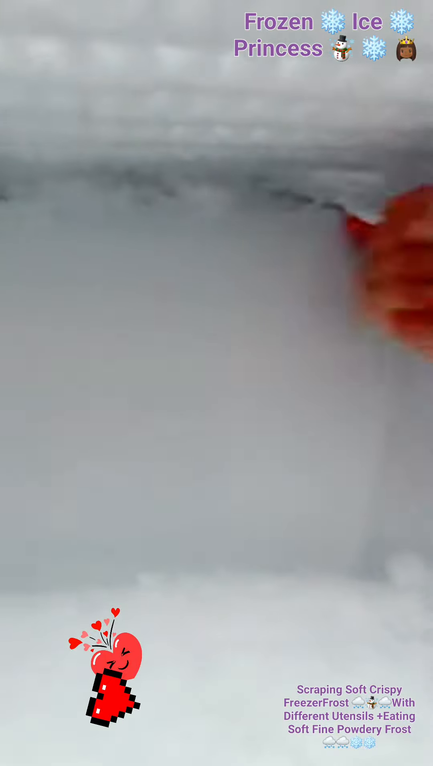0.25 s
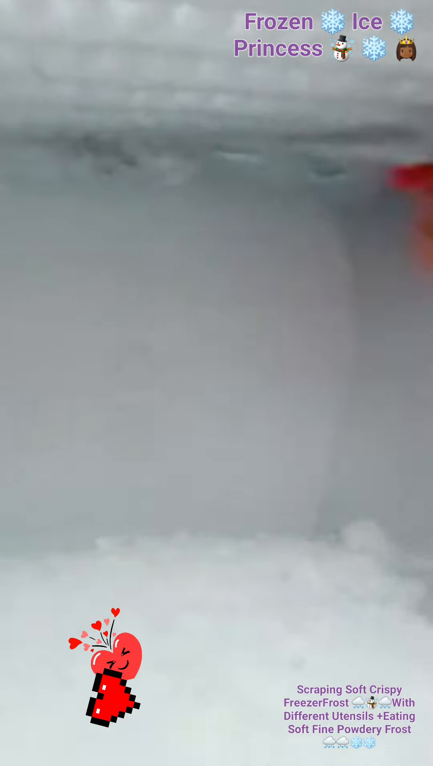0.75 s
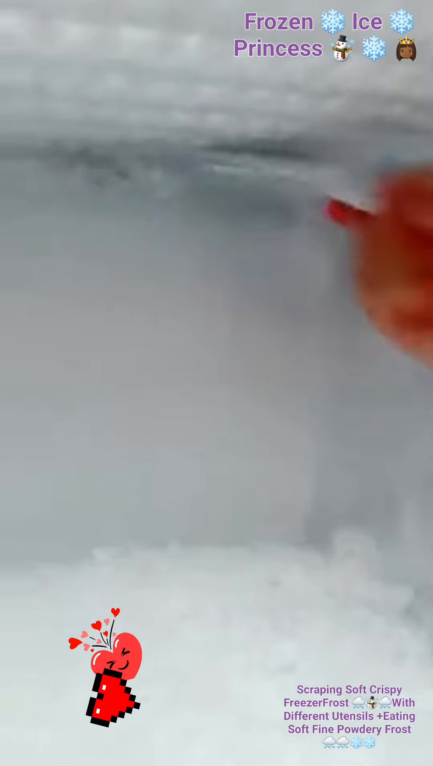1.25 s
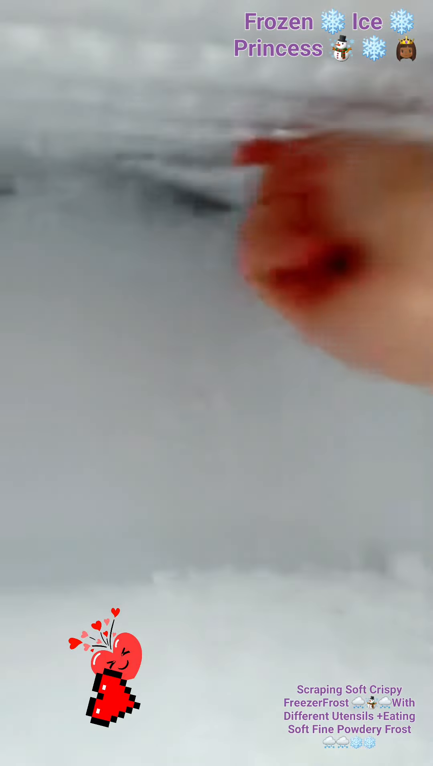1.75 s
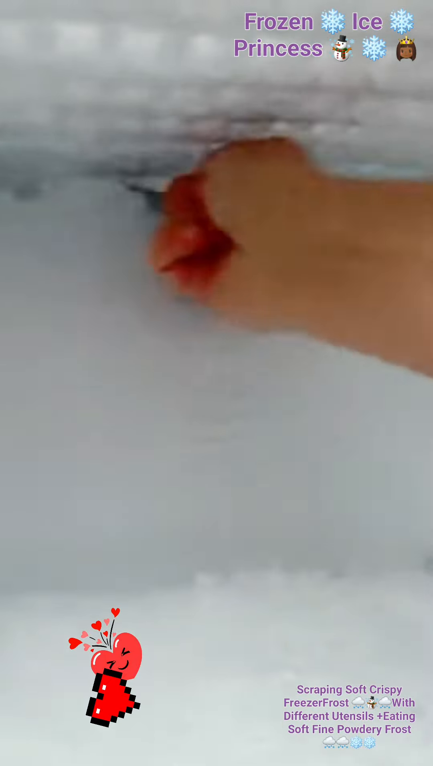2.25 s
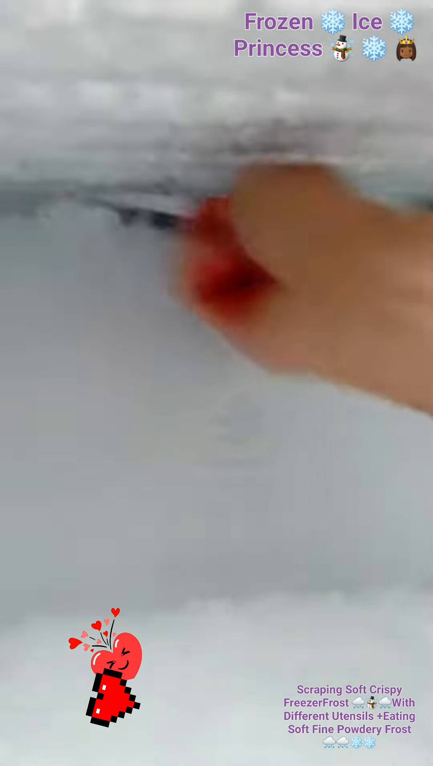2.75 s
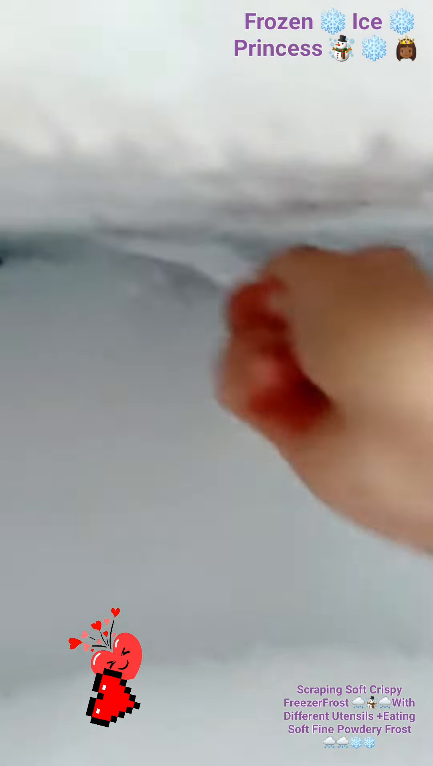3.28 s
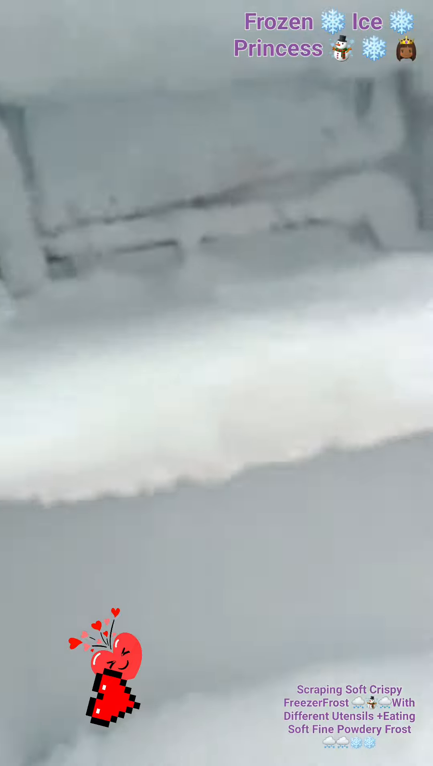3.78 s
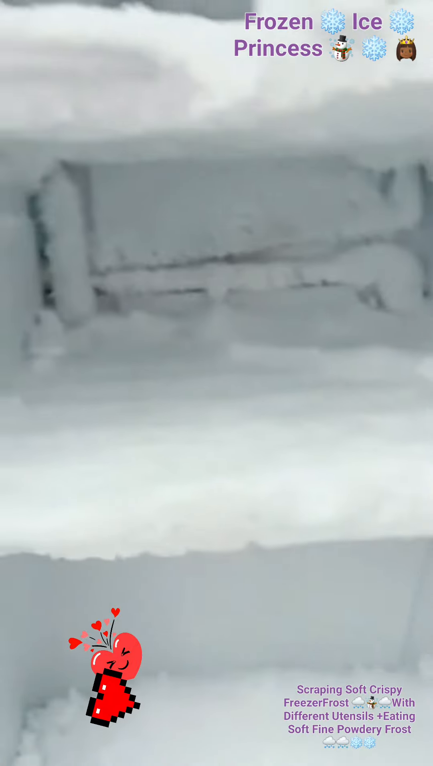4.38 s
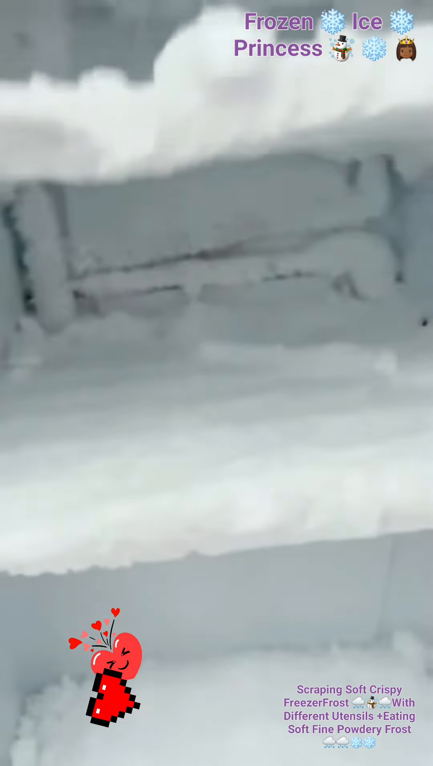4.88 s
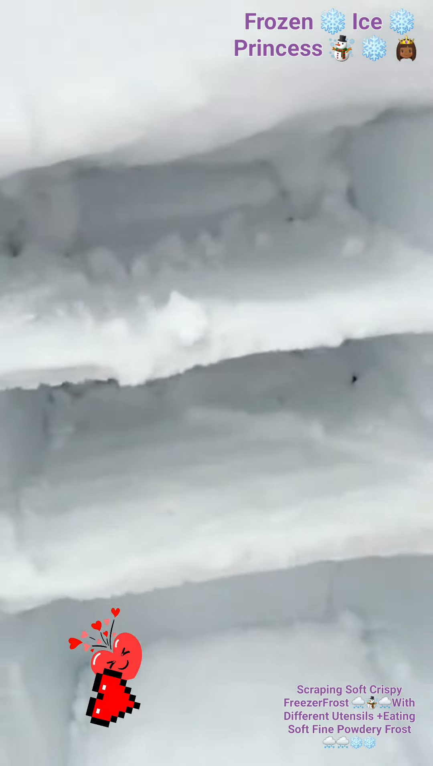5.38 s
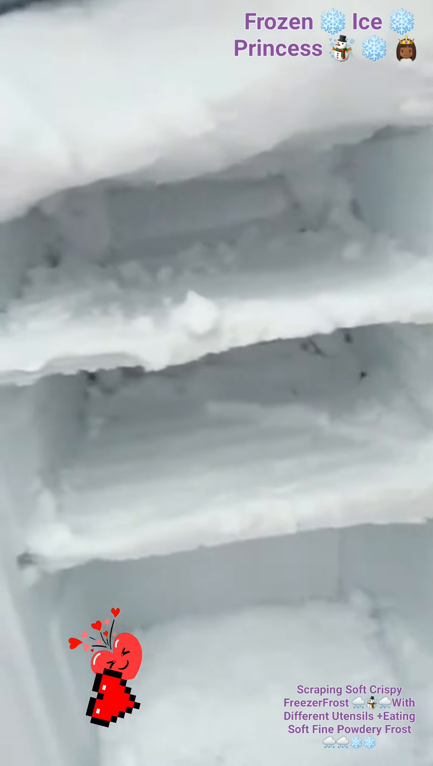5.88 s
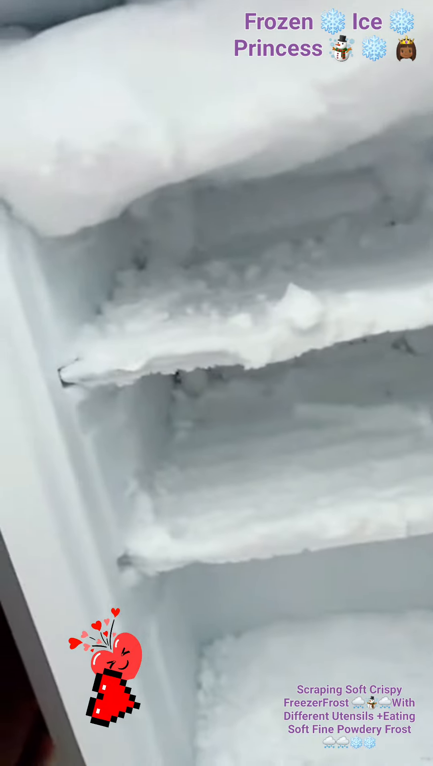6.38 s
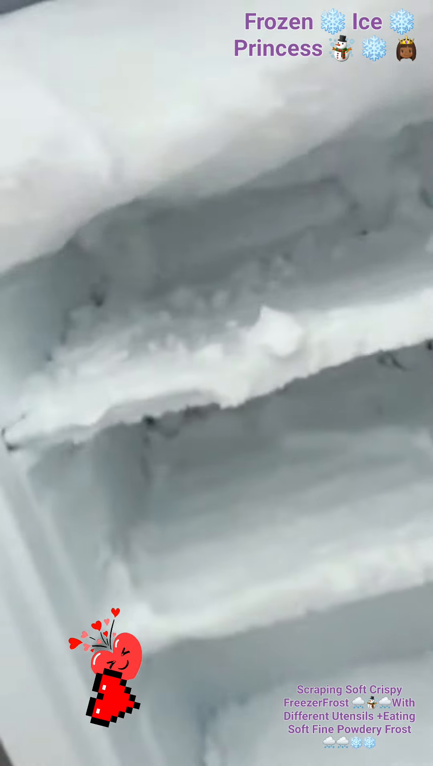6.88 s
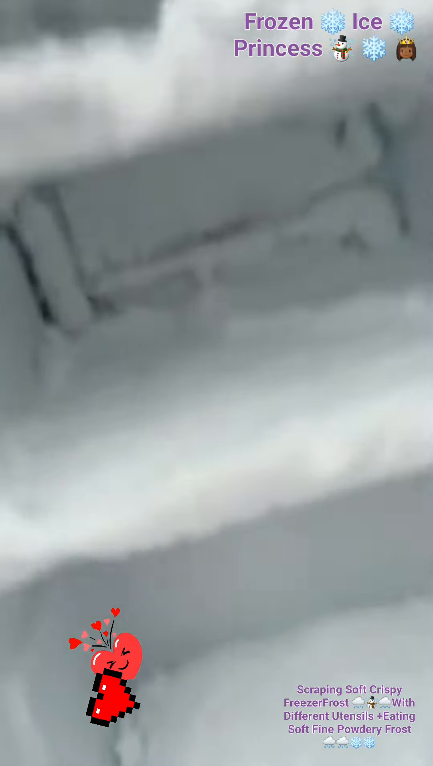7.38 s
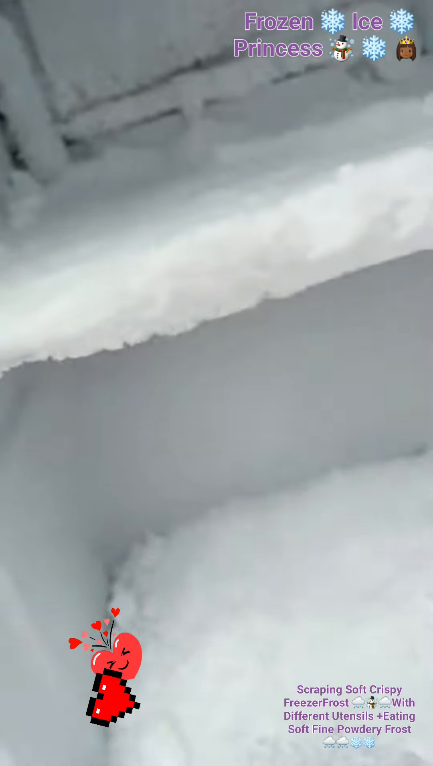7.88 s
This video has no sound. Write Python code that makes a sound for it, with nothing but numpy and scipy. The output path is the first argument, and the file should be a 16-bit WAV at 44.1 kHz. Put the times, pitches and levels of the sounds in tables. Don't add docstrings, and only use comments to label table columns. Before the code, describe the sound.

From 0 to 0.3 s there are only light ticks and a faint scrape. From 0.3 to 3.7 s a utensil scrapes freezer frost in irregular strokes: bright, gritty, crackling pushes, strongest around 0.3, 1.0, 2.0, 2.5 and 3.3 s, with softer returns between. Lumps crunch, the blade sings slightly, and shelf and cabinet answer with hollow low thuds. About 3.8 s a little powder trickles, then quiet scuffs. At 4.3 s a sole taps; at 4.5-4.6 s it squeaks sharply, followed by a heavy knock and short plastic drag. A hissing slide comes at 5.2 s, a tiny creak at 5.7 s and a faint chirp near 5.9 s. Between 6.1 and 6.65 s plastic is shoved and knocked hard several times, clattering away by 7 s. Faint ticks and drags follow, with a short slide at 8.1 s. Low compressor hum and room air continue throughout, dipping after the knocks and recovering.

```python
import sys
import numpy as np
from scipy import signal
from scipy.fft import rfft, irfft, next_fast_len
from scipy.io import wavfile
from scipy.ndimage import uniform_filter1d

SR = 44100
rng = np.random.default_rng(int(sys.argv[2]) if len(sys.argv) > 2 else 0)


def dump(signal):
    limited = np.clip(np.atleast_2d(signal).T, -1, 1)
    pcm = np.round(limited * 32767).astype(np.int16)
    wavfile.write(sys.argv[1], SR, pcm)


def boost_factor(decibels):
    exponent = np.asarray(decibels, float) / 20
    return 10 ** exponent


N = 358958
TIME = np.arange(N) / SR


def kernel(points):
    hz, db = np.transpose(points)
    f = np.maximum(np.fft.rfftfreq(4096, 1 / SR), 1)
    cepstrum = irfft(np.interp(np.log(f), np.log(hz), db) * np.log(10) / 20)
    cepstrum[1:2048] *= 2
    cepstrum[2049:] = 0
    h = irfft(np.exp(rfft(cepstrum)))[:2048]
    return h / np.sqrt(np.sum(h ** 2))


def band(lo_hz, hi_hz, tilt_db):
    return kernel([(lo_hz * 0.56, -40), (lo_hz, 0), (hi_hz, tilt_db), (hi_hz * 1.74, tilt_db - 57.5)])


def modes(table):
    t = TIME[:SR // 5]
    h = np.zeros(len(t))
    for hz, db, t60 in table:
        h += boost_factor(db) / np.sqrt(t60) * np.sin(2 * np.pi * hz * t) * 1000. ** (-t / t60)
    h = signal.sosfilt(signal.butter(6, .85 * table[0][0], "high", fs=SR, output="sos"), h)
    return h / np.sqrt(np.sum(h ** 2))


def through(x, h):
    return signal.oaconvolve(x, h)[:N]


def walk(rate):
    k = int(SR / rate)
    steps = np.repeat(rng.standard_normal(N // k + 1), k)
    return 1.24 * uniform_filter1d(uniform_filter1d(steps, k), k)[:N]


def grains(share, spread_db):
    chance, sign, size = rng.random((3, N))
    x = (chance < share) * np.sign(sign - .5) * boost_factor(-spread_db * np.log(1.002 - size))
    return x / np.sqrt(np.mean(x ** 2))


def effort(rows, start_db, end_db, share, rise, fall):
    t = TIME[::64]
    s, length, a, b, extra = np.transpose(rows)[:, :, None]
    done = np.clip((t - s) / length, 0, 1) ** 0.66
    db = a + start_db + (b + end_db - a - start_db) * done + share * extra
    db = db - rise * np.maximum(s - t, 0) - fall * np.maximum(t - s - length, 0)
    return np.interp(TIME, t, np.sqrt(boost_factor(2 * np.maximum(db, -120)).sum(axis=0)))


def tone(hz, t):
    build_cycles = 0.45
    return (1 - np.exp(-t * hz / build_cycles)) * np.sin(2 * np.pi * hz * t)


def decays(times, dbs, t60s, tones_hz=None):
    out = np.zeros(N)
    for k, (s, db, t60) in enumerate(zip(times, dbs, t60s)):
        i = int(np.ceil(max(s, 0) * SR))
        t = TIME[i:i + SR // 3] - s
        carrier = 1 if tones_hz is None else tone(tones_hz[k], t)
        out[i:i + len(t)] += boost_factor(db) * 1000. ** (-t / max(t60, .004)) * carrier
    return out


def field(bins, hops):
    z = uniform_filter1d(rng.standard_normal((129, N // 64 + 8)), bins, axis=0)
    z = uniform_filter1d(uniform_filter1d(z, hops, axis=1), hops, axis=1)
    return z / z.std()


def patchy(x, patches, tilt_db):
    f, t, z = signal.stft(x, SR, nperseg=256, noverlap=192)
    treble = np.clip((f[:, None] - 7000) / 2500, 0, 1) * np.interp(t, TIME, tilt_db)
    return signal.istft(z * boost_factor(treble + patches[:, :len(t)]), SR, nperseg=256, noverlap=192)[1][:N]


def ridge(table, width_hz):
    t = 64 * np.arange(N // 64 + 8) / SR
    s, hz, db = np.transpose(table)
    away = (np.fft.rfftfreq(256, 1 / SR)[:, None] - np.interp(t, s, hz)) / width_hz
    return np.interp(t, s, db, 0, 0) * np.exp(-away ** 2)


# (f/Hz, level/dB per Hz)
ROOM_COLOUR = [(22, -13.5), (44, -11), (75, -9.5), (107, 4), (167, -5.5), (191, -17), (262, -9.5),
               (330, -19.5), (470, -13.5), (571, -21.5), (638, -12.5), (892, -29), (1170, -20),
               (6500, -24.5), (9500, -31), (15500, -32.5)]


def floor():
    return boost_factor(-50.5 + 2.85 * walk(3.763)) * through(rng.standard_normal(N), kernel(ROOM_COLOUR))


# (f/Hz, level/dB)
HUM_LINES = [(48.4, -51), (96.9, -61.5), (118.4, -60), (145.3, -62.5), (199.2, -62.5), (296.1, -64.5),
             (635.2, -65.5)]


def hum():
    out = np.zeros(N)
    for k, (hz, db) in enumerate(HUM_LINES):
        out += np.sqrt(2) * boost_factor(db - 2.5 + 3.0 * walk(18)) * np.sin(2 * np.pi * hz * TIME + k)
    return out


# (t/s, length/s, start level/dB, end level/dB, brightness/dB)
SCUFFS = [(3.76, 0.11, -81, -88, 25.5), (3.97, 0.097, -48.5, -43.5, 0.5), (4.12, 0.11, -51, -45, 0.5),
          (4.465, .025, -43, -46, -5), (4.271, 0.057, -41, -38.5, 3.5), (4.5, 0.083, -27.5, -26, -3),
          (4.79, 0.024, -32, -40, 0.5), (4.85, 0.3, -46.5, -49, -1.5), (5.58, 0.085, -49.5, -49, 7.5),
          (5.658, 0.053, -43, -44, 6), (5.74, 0.13, -50, -45, 5.5), (5.89, 0.22, -46, -50, -1),
          (7.63, 0.13, -51, -52.5, -2)]
SLIDES = [
    (5.19, 0.13, -42.5, -35.5, 0),
    (8.1, .05, -51.5, -40.5, 1),
]
DRAGS = [
    (4.63, 0.11, -36, -42, -0.5),
    (6.13, 0.085, -25.5, -34, -2),
    (6.23, 0.061, -46, -34.5, -4),
    (6.315, 0.059, -24.5, -26.5, -1.5),
    (6.385, 0.14, -30.5, -28, -0.5),
    (6.519, 0.05, -32, -34, 1),
    (6.587, 0.038, -29.5, -24, 4.5),
    (7.39, 0.19, -57.5, -60, 12),
    (7.8, 0.39, -50.5, -50.5, 13.5),
]
FADES = [
    (6.67, 0.33, -35, -61, 3),
]
CRUMBS = [
    (3.78, 0.17, -48, -54.5, 3),
    (3.855, .012, -52, -49, 4),
]
# (rows, rise/dB per s, fall/dB per s, share of skipping,
# then level/dB of rub, hiss, fine grit, rumble, dust)
SURFACES = [
    (SCUFFS, 1600, 196, 0.86, 0, -3, -7.5, -17, -38),
    (SLIDES, 290, 168, 0.177, 0, 9.8, -2, -4.5, -2),
    (DRAGS, 1700, 430, 1.4, 0, -7.5, -13.5, -0.69, -32),
    (FADES, 900, 100, .1, 0, -4, -15, -0.7, -32),
    (CRUMBS, 1500, 300, .8, -35, -32, -2.5, -3.5, 0.3),
]
# (f/Hz, level/dB per Hz)
GRIT_COLOUR = [(3290, -12), (5600, 5.5), (7580, 2.5), (9060, -7.5), (11900, -16), (14300, -8), (15500, -15)]
# (f/Hz, level/dB per Hz)
HISS_COLOUR = [(1700, -30.5), (2500, -1.5), (3250, -0.7), (3850, -1.5), (4450, -2), (5200, -6),
               (6000, -15.5), (8500, -51.5)]
# (f/Hz, level/dB, t60/s)
TUB_MODES = [(371, 11.5, 0.042), (625, 5, 0.69), (778, -26.5, 0.1), (980, -35, 0.1), (1300, -24, 0.18),
             (1530, 11, 0.14), (1690, 14.5, 0.0075), (1930, 14, 0.13), (2230, -15, 0.13), (2600, 10, 0.053),
             (2800, -7, 0.15), (3160, 3.5, 0.024)]


def shuffle(chatter, patches, hollows):
    grain = grains(.4, 1.94)
    faint = (TIME > SCUFFS[0][0]) * grain
    skips = [grain * boost_factor(row[3] * chatter) for row in SURFACES]

    def layer(k, share):
        return sum(skip * effort(rows, dbs[k], dbs[k], share, rise, fall)
                   for skip, (rows, rise, fall, _, *dbs) in zip(skips, SURFACES))

    rub = layer(0, 0) + boost_factor(-65.5) * faint
    rumble = layer(3, 0) + boost_factor(-62.5) * faint
    high = through(rub, band(1077, 2630, -0.21))
    high += through(layer(2, 1.0), kernel(GRIT_COLOUR))
    high += through(layer(4, 0.704), band(10000, 19000, -1.5))
    hiss = through(layer(1, 0.79), kernel(HISS_COLOUR))
    flat = 0 * TIME
    high = patchy(high, 0.89 * patches, flat) + patchy(hiss, 0.27 * patches + hollows, flat)
    ring = through(rub, modes(TUB_MODES[3:])) + through(rumble, modes(TUB_MODES[:3]))
    return boost_factor(-0.5) * high + through(rumble, band(302, 945, -0.4)) + boost_factor(-9.0) * ring


# (multiple, level/dB)
SQUEAK_ORDERS = [(0.999, -2), (2, -14), (2.9, -20), (4, -25.5)]


def squeak(table, rough):
    s, *columns = np.transpose(table)
    hz, db = [np.interp(TIME, s, c) for c in columns]
    on = (TIME >= s[0]) & (TIME <= s[-1])
    gate = uniform_filter1d(1. * on, 200)
    waver = 1 + rough * walk(300)
    live = gate > 0
    out = np.zeros(N)
    for order, order_db in SQUEAK_ORDERS:
        cycles = np.cumsum(order * hz[live] * waver[live]) / SR
        level = boost_factor(order_db + db[live] + 0.85 * order * walk(90)[live])
        out[live] += level * np.sin(2 * np.pi * cycles)
    return np.sqrt(2) * gate * out


# (t/s, slip rate f/Hz, level/dB)
LOW_SQUEAK = [(4.495, 1128, -32), (4.503, 1130, -17), (4.515, 1198, -15.5), (4.533, 1219, -12),
              (4.546, 1135, -19), (4.56, 1102, -13), (4.58, 1106, -14), (4.598, 1102, -13),
              (4.609, 1005, -22)]
# (t/s, slip rate f/Hz, level/dB)
HIGH_SQUEAK = [(4.49, 1634, -35), (4.503, 1600, -31), (4.52, 1510, -23), (4.535, 1480, -15),
               (4.55, 1463, -20), (4.565, 1464, -31), (4.59, 1450, -31), (4.606, 1475, -44)]
# (t/s, slip rate f/Hz, level/dB)
CHIRP = [
    (5.79, 1037, -53),
    (5.83, 1150, -44),
    (5.88, 1410, -38.5),
    (5.93, 1550, -57),
    (6.02, 1580, -43),
]


def squeaks():
    return squeak(LOW_SQUEAK, 0.012) + squeak(HIGH_SQUEAK, 0.0218) + squeak(CHIRP, 0.09)


# (f/Hz, level/dB, t60/s)
EDGE_MODES = [(1650, 4, 0.029), (2190, 2, 0.017), (2560, 1, 0.03), (2800, -3, .02), (2980, -19, .02),
              (4200, -9, .012), (4656, -8, .015), (6700, -15, .012)]


def creak():
    start_s, gap_s, slips = 5.6617, .0056, 7
    k = np.arange(slips)
    late, louder = rng.standard_normal((slips, 2)).T
    x = np.zeros(N)
    at = ((start_s + gap_s * (k + .08 * late)) * SR).astype(int)
    x[at] = boost_factor(-20.5 + 15.5 - 0.5 * k + 2.5 * louder)
    return through(x, modes(EDGE_MODES))


# (t/s, peak level/dB, treble above it/dB, bass above it/dB, ring f/Hz)
KNOCKS = [(0.0024, -21, 6, -17, 1770), (0.0722, -14.5, -1, -21, 2180), (4.274, -12, -4, -5, 1970),
          (4.3239, -16, 1, -35, 2080), (4.335, -23, 0, -30, 1870), (4.6128, -9.5, -3, 2.5, 1110),
          (4.6315, -15, -7, 3.5, 676), (4.792, -30, 4, -31, 1220), (4.8117, -13, -2, -26, 2030),
          (4.8727, -36.5, -20, 15, 1110), (5.5852, -30, 1, -14, 2210), (6.1256, -2, -6, -3.5, 2010),
          (6.1494, -10, -10, 1, 784), (6.3098, -12, -6, 3.5, 1950), (6.316, -2.5, -1, -3.5, 1790),
          (6.449, -19, -5, 7, 830), (6.482, -10, -14, 2.5, 1550), (6.5207, -4.5, -1.5, -16, 850),
          (6.587, -4, -1.5, -10, 1950), (6.6387, -8, -6, -23, 778), (7.3218, -39.5, 1.5, -13, 1130),
          (7.399, -44, -8, -8, 1180), (7.7967, -31, -4, -5, 806), (7.851, -27.5, -1, -12, 1530),
          (7.9, -25, -14, -10, 1600), (8.091, -26, 1, -25, 3140)]
# (t/s, f/Hz, level/dB, t60/s)
THUDS = [(.322, 437, -21, 0.11), (.52, 600, -23, .05), (0.611, 300, -24, .06), (1.0, 383.5, -9, 0.12),
         (1.0003, 1307, -5.5, 0.025), (1.0014, 1920, -15, 0.038), (1.0012, 2420, -22, .04),
         (1.005, 647, -12.5, 0.078), (1.215, 152.3, -9, 0.2), (1.541, 1244, -19.5, 0.069),
         (1.985, 497, -20, 0.13), (2.055, 483, -17.5, .08), (2.205, 148, -13.5, 0.23),
         (2.21, 292, -18.5, .1), (2.577, 148, -8, 0.18), (2.579, 293, -15.5, 0.095),
         (2.767, 965, -26, 0.12), (3.43, 100, -20, .15), (3.7, 149, -28, .15), (4.476, 228, -28.5, 0.081),
         (4.61, 110, -22, .1), (4.64, 114, -12, 0.15), (4.66, 727, -26, 0.17), (4.662, 1450, -39, .15),
         (4.96, 522, -38.5, 0.15), (5.275, 400, -27, .08), (5.315, 336, -21, 0.082),
         (6.128, 363, -9.5, 0.019), (6.1284, 750, -4.5, 0.024), (6.137, 120, -23, 0.15),
         (6.318, 2590, -19, .04), (6.319, 352, -15.5, 0.045), (6.327, 114, -24.5, 0.27),
         (6.401, 387, -18, 0.16), (6.53, 138, -31, 0.14), (6.598, 1900, -26, 0.14), (6.635, 778, -25, .08),
         (4.678, 1750, -25, .05), (4.684, 1250, -25, 0.057), (6.135, 2510, -24, .1), (6.275, 700, -28, .06),
         (6.335, 960, -16, 0.054), (6.483, 1550, -20, .04), (6.521, 2720, -9, .02), (6.52, 3750, -16, .015),
         (6.555, 2800, -28, .06), (6.59, 554, -18, 0.055), (6.6, 1040, -19, .08), (6.42, 149, -29, 0.18),
         (6.635, 2800, -23, .05)]
# (t/s, f/Hz, level/dB, t60/s)
SNAPS = [
    (.5515, 180, -10, .015),
    (2.058, 5530, -9, .005),
    (2.909, 2500, -21, .005),
    (4.2724, 2000, -8, .006),
    (4.6296, 760, 2.5, 0.0057),
    (6.1254, 1940, 1, 0.0043),
    (6.319, 1750, 2, 0.0051),
    (6.521, 1787, -1.5, 0.0076),
    (6.588, 1830, -15, .006),
]


def knocks():
    s, db, treble_db, bass_db, ring_hz = np.transpose(KNOCKS)
    t60 = 0.053 * (1500 / ring_hz) ** 0.72
    crack = boost_factor(-11.0) * rng.standard_normal(N)
    out = through(crack * decays(s, db, t60), band(1100, 3890, -3.5))
    out += through(crack * decays(s, db + treble_db, 0.74 * t60), band(4570, 21400, -25.5))
    out += through(crack * decays(s, db + bass_db, 1.53 * t60), band(210, 1500, -0.39))
    rings = list(zip(s, ring_hz, db - 9, t60))
    s, hz, db, t60 = np.transpose(rings + THUDS + SNAPS)
    return out + decays(s, db, t60, hz) + creak()


# (t/s, length/s, rasp start level/dB, rasp end level/dB, weight on the shelf/dB)
PUSHES = [(.318, 0.23, -30.5, -18, -3.5), (.555, 0.068, -23.5, -18.5, 1.5), (.945, 0.0098, -38, -24, -2.5),
          (.988, 0.021, -28, -21.5, -4), (1.03, 0.089, -40, -17, -1.5), (1.145, 0.031, -29, -16.5, -1),
          (1.18, 0.052, -33, -37, -5), (1.506, 0.022, -36, -25, -3.5), (1.538, 0.145, -21.5, -19, -1),
          (1.69, 0.029, -20.5, -24, -5), (1.98, 0.072, -29, -22.5, -0.5), (2.082, 0.12, -30.5, -18.5, 0.5),
          (2.425, .14, -35, -15.5, 1.5), (2.858, 0.05, -34, -17.5, 1.5), (2.915, 0.045, -21.5, -30, 3),
          (3.315, 0.064, -29.5, -17, 2), (3.4, 0.04, -18.5, -29, 7)]
PULLS = [(0.0, 0.061, -38.5, -41.5, 1.5), (.1, 0.18, -45.5, -57.5, 0.5), (.72, 0.089, -38.5, -25.5, 0),
         (.86, 0.069, -43, -53, -6), (1.18, 0.054, -27.5, -36, 6.5), (1.29, 0.044, -42, -34, -0.5),
         (1.364, 0.042, -30, -26, -3.5), (1.456, 0.033, -41, -32.5, -0.5), (1.76, 0.13, -37, -34.5, -8),
         (2.26, 0.049, -29.5, -22, -2.5), (2.33, 0.11, -45, -48, -4), (2.64, 0.16, -32.5, -40.5, 4),
         (2.762, 0.057, -39, -32.5, 0.5), (2.95, 0.13, -26, -38, 2.5), (3.108, 0.043, -30.5, -37, 0),
         (3.19, 0.17, -36.5, -54.5, -0.5), (3.44, 0.13, -42, -26.5, -2), (3.62, 0.05, -36, -35.5, 0.5),
         (3.7, 0.16, -70, -58.5, 4.5)]
PUSH_LAWS = {"rasp": (0, -0.7, 0.5, 5999.5, 851), "shelf": (-7.5, -5, 0.53, 1513, 200),
             "cabinet": (-4, -4, 0.56, 1000, 259.5), "fine": (-3, -7, -1.28, 5998.5, 562)}
PULL_LAWS = {"rasp": (-5, 0, 0.5, 900, 450), "shelf": (-0.5, -3.5, 1.31, 800, 311),
             "cabinet": (-7.5, -1.5, 2.5, 598, 198), "fine": (-15, -8.5, 0.5, 900, 496)}
# (t/s, peak level/dB, t60/s)
BITES = [(0.0722, -32, 0.023), (0.32, -2.5, 0.023), (0.405, -8.5, 0.1), (0.733, -12, 0.037),
         (0.9464, -3.5, 0.016), (0.965, -0.5, 0.022), (0.9893, -7.5, 0.04), (1.0867, -2, 0.035),
         (1.3638, -16, 0.033), (1.4567, -11.5, 0.07), (1.5057, -16, 0.023), (1.5392, -24, 0.04),
         (1.875, -19, 0.048), (1.9812, -5.5, 0.02), (2.004, -0.5, 0.017), (2.037, -8, 0.086),
         (2.0553, -1.5, 0.022), (2.0821, -5, 0.05), (2.134, -8, 0.16), (2.4259, -9, 0.058),
         (2.6714, -16, 0.044), (2.8574, -21, 0.04), (3.0325, -36.5, 0.037), (3.1077, -12.5, 0.06),
         (3.205, -18.5, 0.042), (3.317, -4.5, 0.22), (3.377, -8, 0.047), (3.477, -17, 0.028),
         (3.6526, -9.5, 0.035),
         (.3513, -14, .03), (.363, -14, .03), (0.782, -15, .03), (.8, -10, .03), (1.486, -19, .02),
            (2.695, -17, .02), (3.575, -20, .03), (1.0573, -11, .03), (1.102, -1, .04), (1.2957, -24, .03),
            (1.389, -16, .04), (1.5861, -9.5, .03), (1.631, -10, .04), (1.695, -11.5, .05),
            (1.8061, -21, 0.032), (1.8565, -24, .03), (2.1116, -20, .03), (2.2847, -13, .03),
            (2.334, -10.5, 0.032), (2.5034, -4, 0.033), (2.6538, -28, .03), (2.7656, -11, 0.051),
            (2.8813, -23, .03), (2.8933, -14, .03), (2.9078, -17, .03), (3.0544, -33, .03),
            (3.2794, -27, 0.055), (3.5558, -23, .03), (3.636, -16, .03)]
# (f/Hz, level/dB per Hz)
RASP_COLOUR = [(880, -91), (1500, -6.5), (2110, -7.5), (3090, -2.5), (3380, -1), (4610, -2), (6010, -3),
               (7090, 2), (8290, -3), (9230, -4), (11400, -10), (13100, -5.5), (15500, -7)]
# (f/Hz, level/dB, t60/s)
BLADE_MODES = [(3130, -7, 0.0066), (4920, -6.5, 0.007), (6080, 2, 0.017), (6275, 1, 0.0055),
               (6700, 3, 0.007)]
# (f/Hz, level/dB, t60/s)
SHELF_MODES = [(392, -12.5, 0.027), (460, -4, 0.092), (508.7, 1.5, 0.076), (570, 6, 0.012),
               (853, 9, 0.0068), (1213, 0, 0.019), (1380, 2.5, 0.019)]
# (f/Hz, level/dB, t60/s)
CABINET_MODES = [(108, -7, 0.2), (148, 3.5, 0.079), (218.6, 0.5, 0.04), (240, -3, 0.0054),
                 (293, -8.5, 0.13)]


def scraper(chatter, patches):
    part = {}
    for name in PUSH_LAWS:
        part[name] = np.hypot(effort(PUSHES, *PUSH_LAWS[name]), effort(PULLS, *PULL_LAWS[name]))
    crush = grains(.22, 2.67)
    bites = boost_factor(-11.5) * decays(*np.transpose(BITES))
    colour = kernel(RASP_COLOUR) + boost_factor(-12) * modes(BLADE_MODES)[:2048]
    rasp = through(crush * np.hypot(part["rasp"] * boost_factor(chatter), bites), colour)
    rasp = patchy(rasp, patches, 20 * np.log10(part["fine"] / part["rasp"]) + 5.8)
    shelf = through(crush * boost_factor(2.83 * walk(60)) * part["shelf"], modes(SHELF_MODES))
    cabinet = through(crush * boost_factor(2.4 * walk(24.94)) * part["cabinet"], modes(CABINET_MODES))
    return rasp + shelf + cabinet


def scrambled(x):
    z = signal.stft(x, SR, nperseg=256, noverlap=192)[2]
    turned = z * np.exp(4j * field(2, 2)[:, :z.shape[1]])
    y = signal.istft(turned, SR, nperseg=256, noverlap=192)[1][:N]
    return y * x.std() / y.std()


# (f/Hz, level/dB)
PORTS = [(60, -33.5), (500, -34.5), (1500, -29.5), (3600, -22), (5200, -8.5), (9400, -1.5), (9800, -6),
         (11500, -16.5), (13200, -0.5), (16000, -12.5)]


def ports(mid, other):
    size = next_fast_len(N)
    hz, db = np.transpose(PORTS)
    gain = boost_factor(np.interp(np.log(np.fft.rfftfreq(size, 1 / SR) + 1), np.log(hz), db))
    side = irfft(gain * (.8 * rfft(other, size) - .6j * rfft(mid, size)), size)[:N]
    return np.array([mid + side, mid - side])


# (t/s, f/Hz, lift level/dB)
SING = [
    (0.3, 5330, 8.5),
    (0.6, 5900, 3.5),
    (0.7, 4950, -3),
    (0.74, 5540, 5.5),
    (1.75, 6350, 5.5),
    (1.79, 5500, 3),
    (2.19, 6400, 7),
    (2.31, 5900, 3.5),
    (3.72, 5740, 0),
]
# (t/s, f/Hz, lift level/dB)
HOLLOWS = [
    [(5.15, 5200, 0), (5.22, 5040, 8.5), (5.31, 4480, 7), (5.45, 4200, 3)],
    [(5.19, 3500, -1), (5.27, 3400, 1), (5.39, 3300, 11), (5.48, 3200, 0)],
    [(5.2, 7300, -2), (5.28, 7000, 3), (5.36, 6700, 0)],
    [(8.06, 3100, -3), (8.11, 3320, 11), (8.14, 3900, 6)],
]
# (t/s, level/dB)
GAIN = [
    (0, 5.5),
    (3.8, 3),
    (5.3, 5),
    (5.6, 2),
    (6.1, 1.5),
    (6.2, 5),
    (6.8, -7),
    (7.15, 1),
    (7.7, -1.5),
    (8.14, 11),
]


def scene():
    chatter = 1.5 * walk(70) + 0.86 * walk(300)
    patches = 2.7 * field(2, 20) + 1.1 * field(9, 10)
    sing = ridge(SING, 900.)
    hollows = sum(ridge(h, 400.) for h in HOLLOWS)
    gain = boost_factor(np.interp(TIME, *np.transpose(GAIN)))
    mid = gain * floor() + shuffle(chatter, patches, hollows) + squeaks() + knocks()
    mid = mid + scraper(chatter, patches + sing)
    duck = 1 / (1 + uniform_filter1d(np.abs(mid), 4000) / 0.6)
    tail = rng.standard_normal(SR // 3) * 1000. ** (-TIME[:SR // 3] / 0.27)
    mid = mid + boost_factor(-39.0) * through(mid, tail) + duck * gain * hum()
    no_bass = signal.butter(2, 300, "high", fs=SR, output="sos")
    return ports(mid, scrambled(signal.sosfilt(no_bass, mid)))


def roll_off(x):
    return signal.sosfilt(signal.butter(12, 16820, fs=SR, output="sos"), x)


def record(dry):
    top = signal.cheby2(14, 50, 15800 + 250, fs=SR, output="sos")
    mix = signal.sosfilt(top, np.tanh(0.58 * dry) / 0.73)
    return roll_off(mix)


dry = scene()
out = record(dry)
dump(out)
```